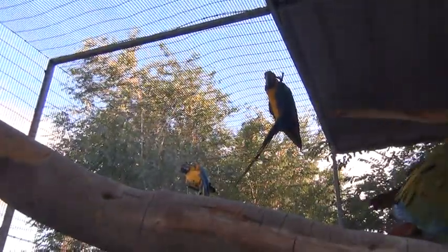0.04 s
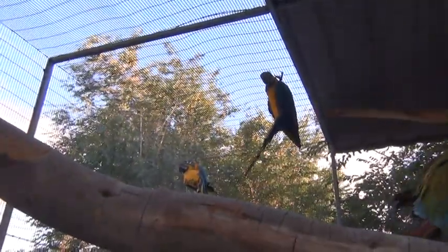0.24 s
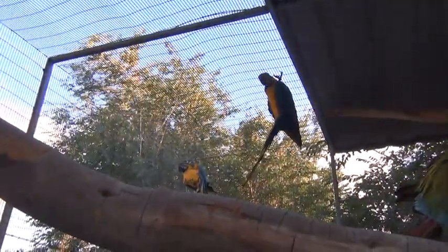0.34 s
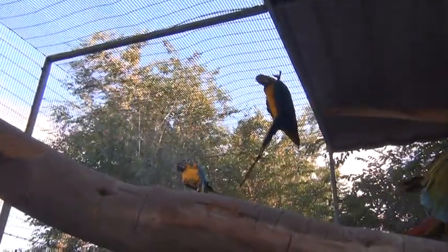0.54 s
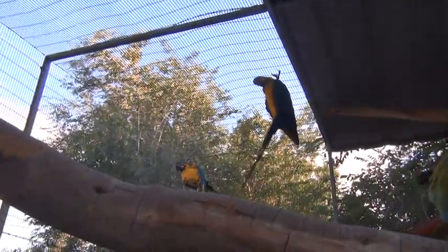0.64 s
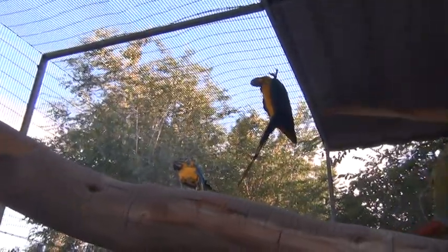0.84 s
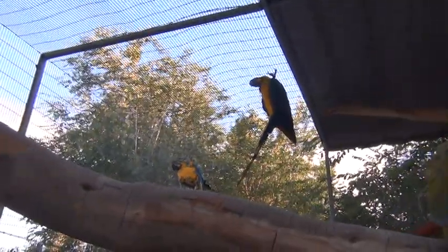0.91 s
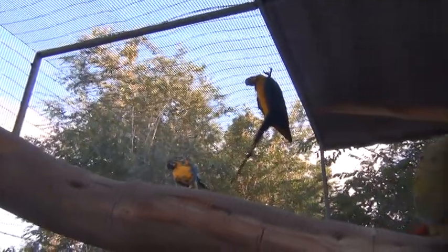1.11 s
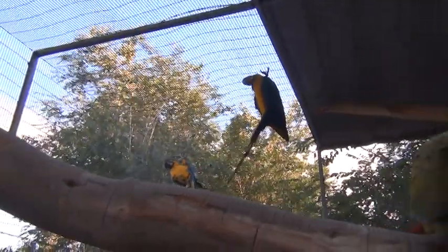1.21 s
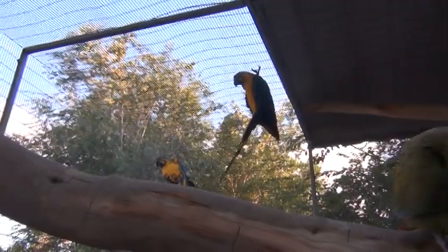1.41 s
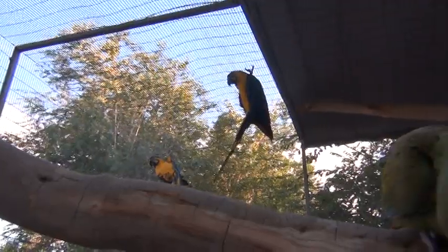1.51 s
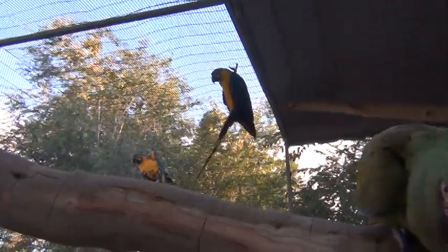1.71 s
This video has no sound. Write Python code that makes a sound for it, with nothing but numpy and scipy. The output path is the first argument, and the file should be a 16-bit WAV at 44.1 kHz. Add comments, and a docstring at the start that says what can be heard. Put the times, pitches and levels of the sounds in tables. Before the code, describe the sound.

A macaw squawks once, loud and harsh, a rising screech dropping into a rattle. Before it, nearby parrots chirp and whistle and feathers rustle; afterwards a small bird trills faintly. The outdoor aviary adds a slight echo.

```python
"""In an outdoor aviary, parrots whistle gliding notes and a bird shifts on its perch with a bump
and a rustle. Then a macaw squawks: pulses from its voice box ring its throat in a rising screech
that breaks up and drops into a harsh rattle. A small bird trills afterwards.
The roof and frame throw the calls back, over the low rumble and hiss of the open air."""
import sys
import numpy as np
from scipy import signal
from scipy.fft import rfft, irfft
from scipy.io import wavfile
from scipy.ndimage import uniform_filter1d, minimum_filter1d

SR = 44100
rng = np.random.default_rng(int(sys.argv[2]) if len(sys.argv) > 2 else 0)


def log_audio(samples):
    """Write samples as a 16-bit WAV file to the path given in sys.argv[1]."""
    # one column per channel
    frames = np.atleast_2d(samples).T
    # limit to full scale, then quantise
    limited = np.clip(frames, -1, 1)
    pcm = np.round(limited * 32767).astype(np.int16)
    wavfile.write(sys.argv[1], SR, pcm)


N = 77175
T = np.arange(N) / SR


# the macaw's screech: (time [s], pitch [Hz], level [dB], roughness [0-1])
SCREECH_PATH = [(1.132, 685, -14.5, .1), (1.139, 722, -13, .08), (1.144, 630, -20, .35),
                (1.157, 632, -24, .25), (1.161, 665, -15.5, .08), (1.174, 738, -14.5, .3),
                (1.198, 715, -14.5, .35), (1.203, 860, -16, .35), (1.222, 893, -14.5, .35),
                (1.243, 965, -14.5, .55), (1.285, 1040, -25, .7)]
# how the throat shapes it, beak shut and beak open: (frequency [Hz], gain [dB])
SHUT_TONE = [(300, -60), (700, -12.5), (1400, -8), (1950, -49), (2450, 16), (2900, 0), (3600, -15),
             (5400, -30), (15000, -67)]
OPEN_TONE = [(300, -42), (600, -25.5), (850, -2), (1450, 1), (2200, -6), (2700, 7), (3150, -8), (3600, -7),
             (5000, -17), (7600, -23), (8600, -29.5), (11300, -27), (13200, -18), (15200, -40)]

def screech():
    """Pulses and puffs of breath ring the macaw's throat; the pitch climbs as the beak opens."""
    hz, db, rough = curves(SCREECH_PATH)
    cycles = np.cumsum(hz * (1 + .055 * rough * wander(rate_hz=470))) / SR
    buzz = (1 - rough) * pulses(cycles, harmonics=20) + rough * puffs(cycles)
    opening = beak_opening()
    voice = (1 - opening) * colour(buzz, SHUT_TONE) + opening * colour(buzz, OPEN_TONE)
    return steady(voice) * amp(db) * gate(SCREECH_PATH, edge_s=.003)


def beak_opening(start_s=1.156, end_s=1.175):
    """The beak goes from shut (0) to open (1)."""
    return np.clip((T - start_s) / (end_s - start_s), 0, 1)


# a higher note over the screech: (time [s], pitch [Hz], level [dB])
SECOND_PATH = [(1.14, 1486, -27), (1.158, 1537, -23), (1.175, 1609, -26.5), (1.205, 1674, -23),
               (1.245, 1773, -21)]
# its harmonics, the tones at 1, 2, 3... times its pitch: (gain [dB])
SECOND_HARMONICS = [2, 9, 4, -3.5, -10, -11, -17, -12]

def second_voice():
    """The other side of the voice box sings its own rising note, brighter as the beak opens."""
    hz, db = curves(SECOND_PATH)
    phase = 2 * np.pi * np.cumsum(hz * (1 + .028 * wander(rate_hz=470))) / SR
    muffle_db = -2 * (1 - beak_opening())  # per harmonic
    note = sum(amp(gain_db + k * muffle_db) * np.sin(k * phase)
               for k, gain_db in enumerate(SECOND_HARMONICS, 1))
    return steady(note) * amp(db) * gate(SECOND_PATH, edge_s=.007)


# the macaw's rattle: (time [s], pulse rate [Hz], level [dB], roughness [0-1], mouth ring [Hz])
RATTLE_PATH = [(1.228, 326, -26, .8, 1650), (1.258, 334, -16.5, .8, 1380), (1.278, 322, -17, .6, 1130),
               (1.314, 280, -16, .16, 1340), (1.345, 279, -15.5, .07, 1430), (1.374, 281, -14, .08, 1400),
               (1.391, 272, -14, .3, 1270), (1.402, 304, -14, .42, 1230), (1.419, 310, -22.5, .41, 1260),
               (1.442, 300, -37, .37, 1250)]
# how the throat shapes it when firm and when loose: (frequency [Hz], gain [dB])
FIRM_TONE = [(130, -54), (280, -15.5), (550, -28.5), (900, -39), (1130, -13), (1650, -6), (1970, 4.5),
             (2300, -3.5), (2790, -2.5), (3300, -8), (3900, -3.5), (5500, -26), (6500, -19), (15000, -45)]
LOOSE_TONE = [(200, -29), (600, -25.5), (1050, -6), (1950, 2.5), (2500, -8), (4100, -12), (15000, -52.5)]

def rattle():
    """Slower, hard pulses ring the throat, moving mouth and windpipe; ragged at both ends."""
    hz, db, rough, mouth_hz = curves(RATTLE_PATH)
    cycles = np.cumsum(hz * (1 + .18 * rough * wander(rate_hz=250))) / SR
    buzz = (1 - rough / 2) * pulses(cycles, harmonics=53) + (.68 + rough) * puffs(cycles)
    mouth = resonate(buzz, mouth_hz, width_hz=230)
    mouth = resonate(mouth, mouth_hz, width_hz=230)  # twice, for a sharper ring
    firm = colour(buzz, FIRM_TONE) + amp(db=1.5) * mouth
    ragged = colour(buzz, LOOSE_TONE) + amp(db=8) * mouth
    loose = np.clip(rough / .47, 0, 1)
    voice = (1 - loose) * firm + loose * ragged
    windpipe = amp(db=7) * resonate(voice, hz=np.full(N, 2780), width_hz=170)
    return steady(voice + windpipe) * amp(db) * gate(RATTLE_PATH, edge_s=.0039)


# parrots nearby and birds farther off, one list per note: (time [s], pitch [Hz], level [dB])
NEAR_NOTES = [
    [(0, 2850, -26), (.016, 2400, -36)],
    [(.06, 3100, -43), (.085, 2650, -29), (.098, 2150, -44)],
    [(.175, 3000, -46), (.209, 3400, -30), (.237, 2620, -25), (.26, 1950, -40), (.278, 2800, -26),
     (.286, 3350, -33), (.297, 3150, -41)],
    [(.34, 4150, -42), (.362, 3950, -41), (.374, 3990, -24), (.385, 4080, -25), (.392, 4080, -16),
     (.402, 3100, -35)],
    [(.402, 3900, -35), (.414, 4250, -29), (.42, 3350, -30), (.437, 2520, -31), (.456, 2550, -45)],
    [(.49, 3950, -42), (.502, 4300, -30), (.515, 4950, -33), (.53, 4250, -25), (.545, 3550, -40)],
    [(.566, 3750, -38), (.586, 3450, -24), (.597, 2950, -28), (.609, 2620, -25), (.619, 2750, -34)],
    [(.624, 3300, -36), (.643, 2250, -37)],
    [(.699, 2650, -33), (.717, 1850, -43), (.731, 2480, -28), (.741, 2900, -26)],
    [(.803, 3200, -29), (.819, 3050, -26), (.834, 2620, -22), (.845, 2620, -29)],
    [(.858, 3200, -30), (.882, 2150, -35)],
    [(.972, 3920, -33), (1.001, 3930, -29), (1.007, 3900, -17), (1.011, 3550, -28), (1.022, 3600, -35)],
    [(1.052, 2950, -38), (1.068, 2680, -26), (1.08, 2300, -36)],
]
FAR_NOTES = [
    [(.665, 3120, -48), (.79, 3180, -41)],
    [(.73, 5210, -47), (.765, 5250, -43), (.80, 5310, -61)],
    [(.755, 4650, -38), (.825, 4440, -47.5)],
    [(.80, 3587, -33.5), (.855, 3760, -40.5)],
]

def whistles(notes, wobble):
    """Birds whistle pure gliding notes; wobble is the waver as a share of the pitch."""
    out = np.zeros(N)
    for note in notes:
        hz, db = curves(note)
        pitch = uniform_filter1d(hz, size=200) * (1 + wobble * wander(rate_hz=420))
        phase = 2 * np.pi * np.cumsum(pitch) / SR
        out += np.sqrt(2) * amp(db) * gate(note, edge_s=.0026) * np.sin(phase)
    return out


# how loud the trill is: (time [s], level [dB])
TRILL_LEVEL = [(1.57, -49), (1.635, -38), (1.75, -39.5)]

def trill(centre_hz=3350, sweep_hz=59, dip_db=-2.5):
    """A small bird sweeps a rough whistle quickly up and down, loudest at the top."""
    sweeps = np.cumsum(sweep_hz * (1 + .148 * wander(rate_hz=30.7))) / SR
    swing = np.sin(2 * np.pi * sweeps)
    rasp = .042 * wander(rate_hz=355)
    phase = 2 * np.pi * np.cumsum(centre_hz * (1 + .105 * swing + rasp)) / SR
    db = curves(TRILL_LEVEL)[0] + dip_db * (1 - swing) / 2
    return np.sqrt(2) * np.sin(phase) * amp(db) * gate(TRILL_LEVEL, edge_s=.011)


# bumps on the perch: (time [s], pitch [Hz], length [s], level [dB])
PERCH_BUMPS = [(.868, 189.5, 0.053, -35), (.895, 100, 0.054, -35.5), (.91, 197, 0.039, -40)]

def perch():
    """Soft, low bumps as a bird shifts its weight."""
    out = np.zeros(N)
    for start, hz, length, db in PERCH_BUMPS:
        progress = np.clip((T - start) / length, 0, 1)
        swell = np.sin(np.pi * progress ** .65)
        out += amp(db) * np.sqrt(2) * swell * np.sin(2 * np.pi * hz * (T - start))
    return out


# feather strokes: (time [s], level [dB], fade time [s])
FEATHER_STROKES = [(0, -45, 0.21), (0.891, -41.5, 0.049), (0.991, -33.5, 0.058), (1.064, -48, 0.071),
                   (1.47, -44, .07)]
# their bright tone: (frequency [Hz], gain [dB])
FEATHER_TONE = [(500, -50), (2000, 4), (7500, 0), (12500, -4.5), (15000, -35)]

def rustle(rise_s=.00061):
    """Feathers make a grainy hiss in quick strokes that die away."""
    level = np.zeros(N)
    for start, db, fade_s in FEATHER_STROKES:
        age = np.maximum(T - start, 0)
        level += amp(db) * np.minimum(age / rise_s, 1) * np.exp(-age / fade_s)
    grains = rng.standard_normal(N) * amp(2 * wander(rate_hz=600))
    return level * unit(colour(grains, FEATHER_TONE))


def tick(start_s=.9245, fade_s=.0017, above_hz=9500):
    """One tiny dry click close by, as of a claw."""
    treble = signal.butter(2, above_hz, "high", fs=SR, output="sos")
    hiss = unit(signal.sosfilt(treble, rng.standard_normal(N)))
    return amp(db=-30) * hiss * (T > start_s) * np.exp(-abs(T - start_s) / fade_s)


# how loud the rush of air is: (time [s], level [dB])
RUSH_LEVEL = [(.86, -41.5), (.93, -34.5), (1.01, -32.5), (1.16, -28.5), (1.3, -49), (1.47, -34.5),
              (1.68, -47)]
# its hoarse tone: (frequency [Hz], gain [dB])
RUSH_TONE = [(150, -22), (420, -7), (1200, -2.5), (2000, -8), (5000, -18.5), (15000, -35)]

def rush():
    """A hoarse, fluttering rush of air before, under and after the squawk."""
    flutter = rng.standard_normal(N) * amp(2.56 * wander(rate_hz=185))
    return unit(colour(flutter, RUSH_TONE)) * amp(curves(RUSH_LEVEL)[0]) * gate(RUSH_LEVEL, edge_s=.14)


# the tone of the open air: (frequency [Hz], gain [dB])
OUTDOOR_TONE = [(20, -23), (88, 1), (130, -2), (500, -4), (2000, -11.5), (3200, -5.5), (5000, -16.5),
                (11000, -22.5), (15500, -31)]
# how loud it is: (time [s], level [dB])
OUTDOOR_LEVEL = [(0, -38), (1.1, -37.5), (1.21, -48.5), (1.41, -40.5), (1.55, -40), (1.75, -41)]
# how alike it is in both ears: (frequency [Hz], likeness [0-1])
EAR_LIKENESS = [(60, 1), (400, 0.97), (3000, 0.55)]

def air():
    """Distant rumble and hiss of the open air; the background level sinks around the squawk."""
    hz = np.fft.rfftfreq(N, 1 / SR)
    left, other = rfft(rng.standard_normal((2, N)))
    alike = look_up(EAR_LIKENESS, hz)
    right = alike * left + np.sqrt(1 - alike ** 2) * other
    stereo = irfft(np.array([left, right]) * amp(look_up(OUTDOOR_TONE, hz)), N)
    return unit(stereo) * amp(curves(OUTDOOR_LEVEL)[0])


# how long the aviary rings: (frequency [Hz], time to fade by 60 dB [s])
ECHO_FADE = [(2000, 0.44), (14000, 0.37)]
# how far its echoes spread sideways: (frequency [Hz], gain [dB])
ECHO_SPREAD = [(500, -1), (5000, -0.5), (13000, -7.5)]

def aviary(x, pan_db, early_db, tail_db, early_s, width, bounces=14):
    """The roof and frame add a few early echoes and a short, blurred tail, in stereo."""
    size = SR // 2
    hz, t, noise = signal.stft(rng.standard_normal((2, size)), SR, nperseg=256)
    fade = amp(-60 * t / look_up(ECHO_FADE, hz)[:, None])
    build_up = np.minimum(t / .034, 1)
    tail = signal.istft(noise * fade * build_up, SR, nperseg=256)[1][:, :size]
    early = np.zeros((2, size))
    for channel in early:
        lateness = (np.arange(bounces) + rng.random(bounces)) / bounces
        delays = ((.002 + lateness * early_s) * SR).astype(int)
        channel[delays] = rng.choice([-1, 1], bounces) * np.exp(-lateness)
    echo = amp(early_db) * early / np.linalg.norm(early[0])
    echo += amp(tail_db) * tail / np.linalg.norm(tail[0])
    middle, side = signal.fftconvolve(x[None], echo, axes=1)[:, :N]
    side = width * colour(side, ECHO_SPREAD)
    return np.array([(x + middle + side) * amp(pan_db / 2), (x + middle - side) * amp(-pan_db / 2)])


def pulses(cycles, harmonics):
    """One sharp pulse per cycle of the voice."""
    return unit(sum(np.cos(2 * np.pi * k * cycles) for k in range(1, harmonics + 1)))


def puffs(cycles, fade_cycles=.67):
    """One puff of breath per cycle of the voice."""
    return unit(np.exp(-(cycles % 1) / fade_cycles) * rng.standard_normal(N))


def resonate(x, hz, width_hz):
    """Rings like a hollow space whose pitch follows hz."""
    spin = np.exp(2j * np.pi * np.cumsum(hz) / SR)
    decay = np.exp(-np.pi * width_hz / SR)
    return 2 * (spin * signal.lfilter([1 - decay], [1, -decay], x / spin)).real


def colour(x, tone, size=2048):
    """Turns each frequency up or down as a tone table says."""
    log_gain = np.log(amp(look_up(tone, abs(np.fft.fftfreq(size, 1 / SR)))))
    ring = np.fft.ifft(np.exp(np.conj(signal.hilbert(log_gain)))).real  # never ahead of the sound
    return signal.fftconvolve(x, ring[:size // 2])[:N]


def wander(rate_hz):
    """A smooth random wiggle, mostly slower than rate_hz."""
    hz = np.fft.rfftfreq(N, 1 / SR)
    return unit(irfft(rfft(rng.standard_normal(N)) / (1 + (hz / rate_hz) ** 4), N))


def curves(rows):
    """Joins the dots of a timed table, one curve per column after the time."""
    times, *columns = np.transpose(rows)
    return [np.interp(T, np.sort(times), column) for column in columns]


def gate(rows, edge_s):
    """On from the first row's time to the last, with soft edges."""
    return np.clip(1 + np.minimum(T - rows[0][0], rows[-1][0] - T) / edge_s, 0, 1)


def look_up(rows, hz):
    """A frequency table's value at hz."""
    row_hz, value = np.transpose(rows)
    return np.interp(np.log(hz + 1), np.log(row_hz + 1), value)


def steady(x, size=700):
    """Evens out the strength from moment to moment."""
    power = uniform_filter1d(uniform_filter1d(x ** 2, size), size)
    return x / np.sqrt(abs(power) + 1e-12)


def unit(x):
    """Sets the average strength (rms) to 1."""
    return x / np.sqrt(np.mean(x ** 2) + 1e-20)


def amp(db):
    """Turns decibels into a multiplier."""
    return 10 ** (np.asarray(db) / 20)


def scene():
    """All the birds in the aviary, over the outdoor air."""
    parrots = aviary(whistles(NEAR_NOTES, wobble=.02),
                     pan_db=2, early_db=-4.5, tail_db=-13.5, early_s=.03, width=.54)
    far_birds = aviary(trill() + whistles(FAR_NOTES, wobble=.0309),
                       pan_db=2.5, early_db=2, tail_db=0, early_s=.024, width=.76)
    macaw = aviary(screech() + second_voice() + rattle(),
                   pan_db=0, early_db=-6, tail_db=-10, early_s=.02, width=.5)
    stirring = aviary(rustle() + rush(), pan_db=0, early_db=-7.5, tail_db=-7.5, early_s=.015, width=.54)
    return macaw + parrots + far_birds + stirring + perch() + tick() + air()


def record(dry, ceiling=.56, top_hz=15750):
    """Quickly turns down the loudest peaks, then cuts the very highest treble."""
    allowed = np.minimum(1, ceiling / (abs(dry).max(0) + 1e-9))
    gain = uniform_filter1d(minimum_filter1d(allowed, size=300), size=300)
    treble_cut = signal.firwin(511, top_hz, window=("kaiser", 9), fs=SR)
    return signal.oaconvolve(dry * gain, treble_cut[None], "same")


dry = scene()
out = record(dry)
log_audio(out)
```